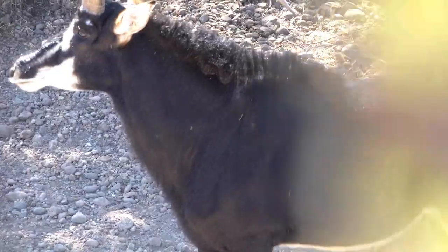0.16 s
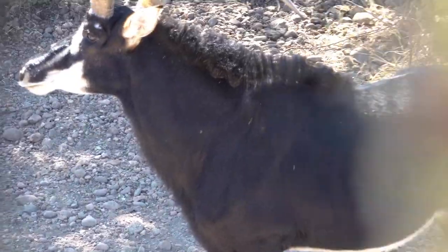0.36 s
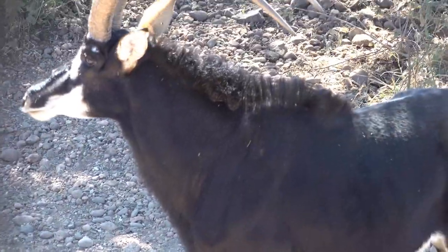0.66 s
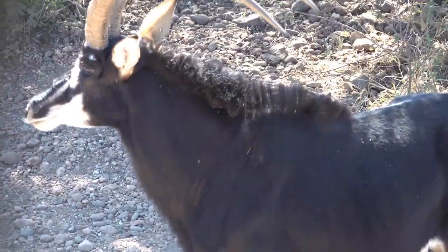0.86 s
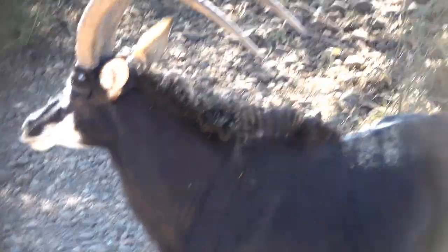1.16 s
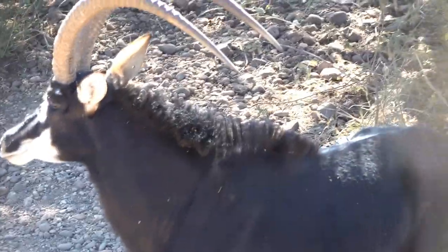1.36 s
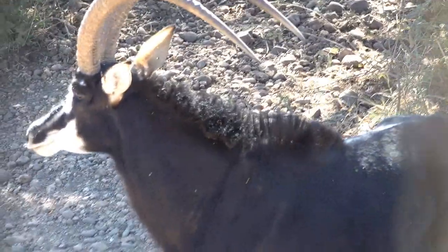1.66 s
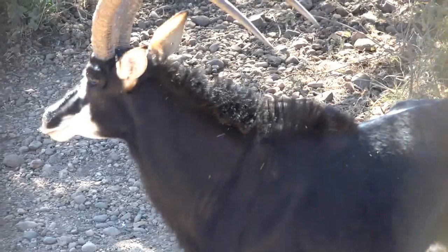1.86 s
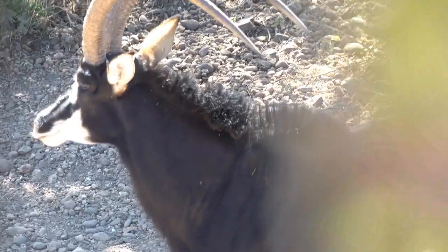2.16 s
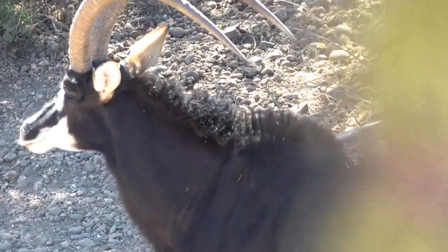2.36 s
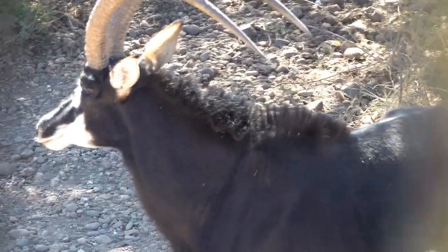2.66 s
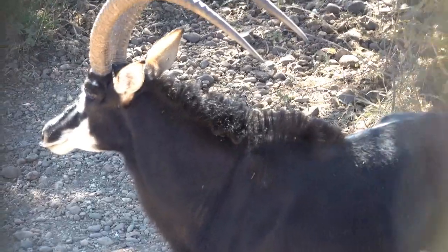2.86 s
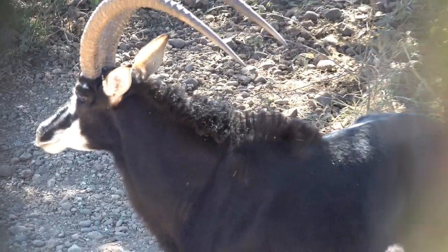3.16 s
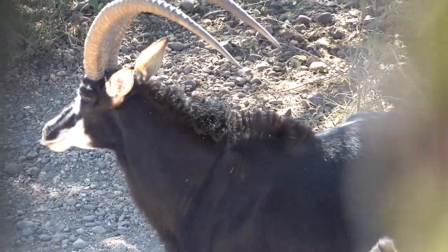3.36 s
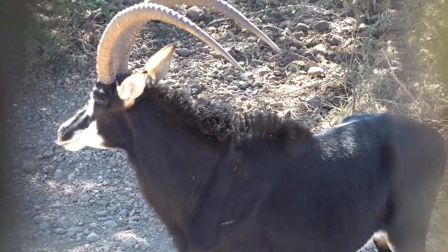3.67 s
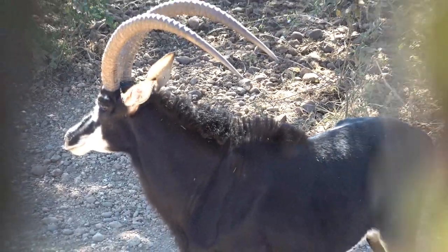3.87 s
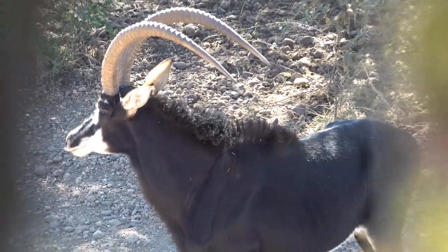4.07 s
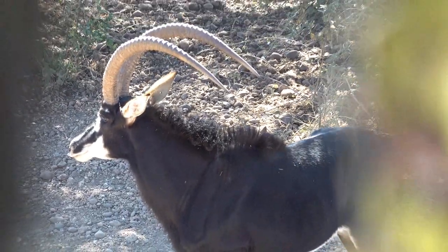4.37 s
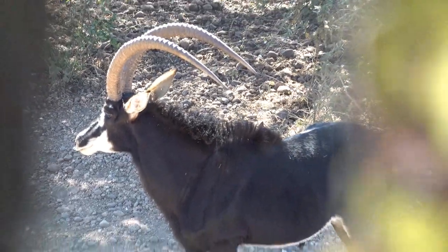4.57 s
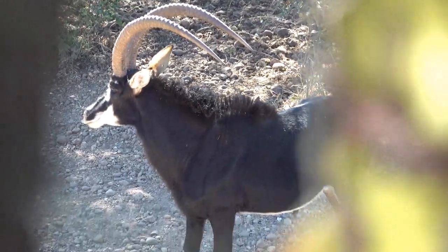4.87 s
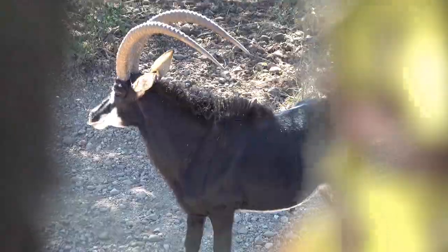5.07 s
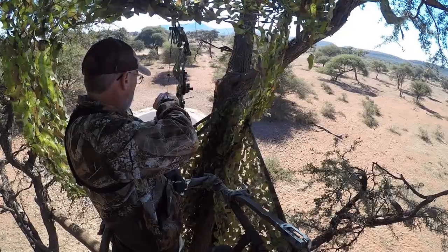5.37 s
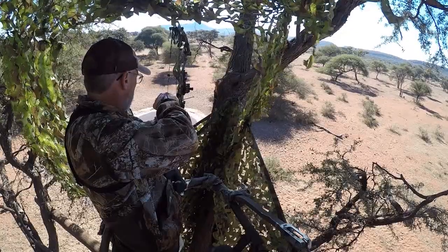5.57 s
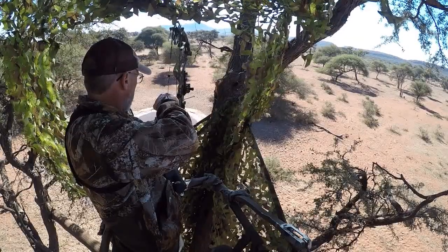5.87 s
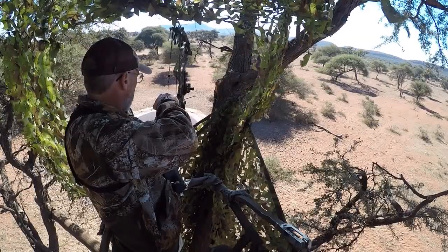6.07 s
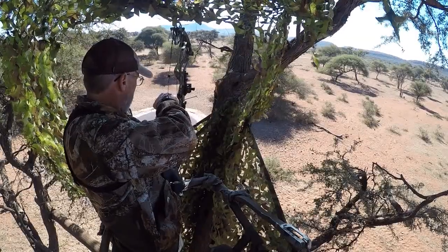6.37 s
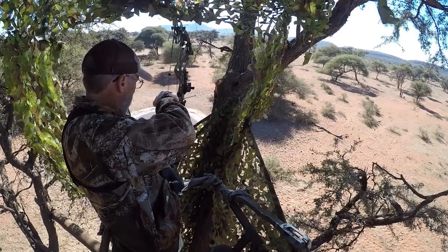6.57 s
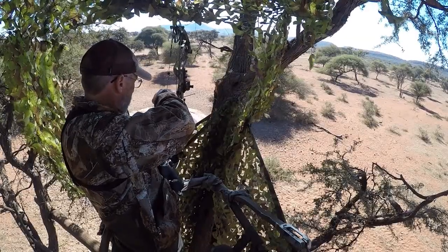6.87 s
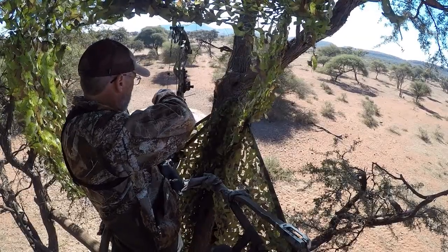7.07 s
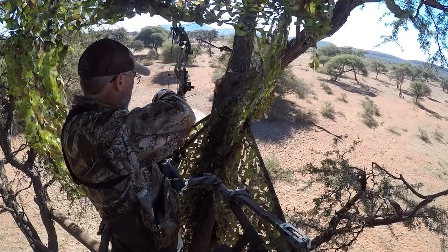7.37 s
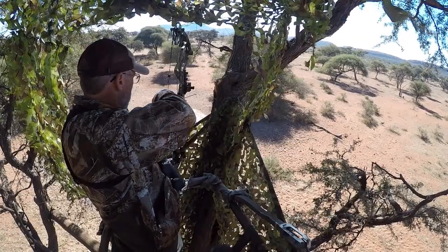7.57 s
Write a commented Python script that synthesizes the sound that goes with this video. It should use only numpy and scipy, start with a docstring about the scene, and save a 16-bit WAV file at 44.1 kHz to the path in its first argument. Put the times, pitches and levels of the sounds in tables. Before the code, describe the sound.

Dry open bush with many wild birds near and far, over quiet air, faint wide hiss and a barely audible high electronic whine. From 0 to 2 seconds it is sparser: soft rounded peeps, two faint low hoots near 0.5 and 1.1, a thin wavering whistle from 0.6 that dips and climbs, clearer peeps at 1.7, and dry twig ticks between 1.4 and 1.9. From 2.1 harsh falling chirps arrive with brief raspy chacks, and the distant chorus thickens around 3. Deep wind gusts buffet the microphone most at 2.5 to 3.5, again near 4.1 and 5.8, and lightly at 7.5. The wavering song returns around 3, 5 and 6.6. Two-part cheeps sound at 4.3, 4.8, 5.4 and 6.1. Rough chirps cluster near 6.7, then three clear peeps fade into sparse slurs, a chack and a thin squeak by 7.5. Scrub softly echoes everything.

```python
"""Many wild birds call together in dry bush: arched peeps, slurred whistles, a long wavering song,
harsh chirps, squeaks and chacks. They are sines on moving pitches; the chacks stack harmonics.
Two hoots come from far away, noise bursts make twigs tick, and the scrub echoes every call.
Shaped noise makes nearly mono gusts rumble, over still air and a faint hiss that differs left and right."""
import sys
import numpy as np
from scipy import signal
from scipy.fft import rfft, irfft, next_fast_len
from scipy.io import wavfile
from scipy.ndimage import map_coordinates

SR = 44100
rng = np.random.default_rng(int(sys.argv[2]) if len(sys.argv) > 2 else 0)


def persist_wave(psi):
    """Save psi, clipped to +-1, as 16-bit WAV."""
    counts = np.round(np.clip(psi, -1, 1) * 32767).astype(np.int16)
    wavfile.write(sys.argv[1], SR, np.atleast_2d(counts).T)


N = 340011


def amp(db):
    """Turn decibels into a gain."""
    return 10 ** (np.asarray(db) / 20)


def unit(x):
    """Scale a sound to an rms of 1."""
    return x / np.sqrt(np.mean(x ** 2) + 1e-20)


def along(points, hz):
    """Read (Hz, value) points at any frequency, on a log axis."""
    point_hz, values = np.transpose(points)
    return np.interp(np.log(hz + 1), np.log(point_hz + 1), values)


def curves(rows):
    """Give one value per sample for each column after the time."""
    seconds, *columns = np.transpose(rows)
    return [np.interp(np.arange(N) / SR, seconds, column) for column in columns]


def wobble(rate, size):
    """A smooth random curve through `rate` random points a second."""
    points = rng.standard_normal(int(size * rate / SR) + 4)
    return map_coordinates(points, [np.arange(size) * rate / SR])


def filtered(x, response):
    """Multiply the spectrum of x by a gain that depends on frequency."""
    size = next_fast_len(N + SR // 2)
    spectrum = rfft(x, size) * response(np.fft.rfftfreq(size, 1 / SR))
    return irfft(spectrum, size)[..., :N]


def noise(spectrum):
    """Coloured noise with an rms of 1."""
    return unit(filtered(rng.standard_normal(N), lambda hz: amp(along(spectrum, hz))))


def add(track, start_s, sound):
    """Mix a sound into a track, cutting what falls outside it."""
    start = round(start_s * SR)
    part = sound[max(-start, 0):max(N - start, 0)]
    track[max(start, 0):][:len(part)] += part


def progress(length_s):
    """Count from 0 to 1 through a note."""
    return np.linspace(0, 1, max(int(length_s * SR), 16))


def swell(u, power):
    """A note's loudness rises and falls; a small power makes it fuller."""
    return np.abs(np.sin(np.pi * u)) ** abs(power)


def glide(u, start, middle, end):
    """A parabola through three pitches."""
    return np.polyval(np.polyfit([0, .5, 1], [start, middle, end], 2), u)


def tone(hz):
    """A sine on a moving pitch, with an rms of about 1."""
    return np.sqrt(2) * np.sin(2 * np.pi * np.cumsum(hz) / SR)


def scrub(x, near_db, far_db):
    """Ground and branches give quick weak copies; the bush beyond gives a diffuse tail."""
    # time the tail takes to fade by 60 dB: pitch_hz [Hz], fade_s [s]
    decay_times = [(500, 0.96), (2300, 0.63), (4000, 0.36), (8000, 0.39)]
    hz, t, cells = signal.stft(rng.standard_normal(SR * 3 // 4), SR, nperseg=256)
    fade = amp(-60 * t / along(decay_times, hz)[:, None])
    tail = signal.istft(cells * fade, SR, nperseg=256)[1]
    answer = amp(far_db) * tail / np.linalg.norm(tail)
    delays_s = rng.uniform(0.001996, .028, size=12)
    signs = rng.choice([-1, 1], size=12)
    answer[(delays_s * SR).astype(int)] += amp(near_db) * signs / np.sqrt(len(delays_s))
    return x + signal.fftconvolve(x, answer)[:N]


def whistles(notes, power, waver, flicker_db, overtone_db, flat_top):
    """Nearly pure notes, each one bend of the syrinx (a bird's voice organ)."""
    out = np.zeros(N)
    for start_s, length_s, start_hz, middle_hz, end_hz, level_db in notes:
        u = progress(length_s)
        # flat_top above 0 gives quick flanks and a pitch that lingers at mid-note
        bend = u + flat_top * np.sin(2 * np.pi * u) / (2 * np.pi)
        hz = glide(bend, start_hz, middle_hz, end_hz) * (1 + waver * wobble(248.7, len(u)))
        voice = tone(hz) + amp(overtone_db) * tone(2 * hz)
        flicker = flicker_db * wobble(86.0, len(u))
        add(out, start_s, voice * swell(u, power) * amp(level_db + flicker))
    return out


def peeps():
    """Flat-topped arches of pitch, all one shape scaled to the top pitch."""
    # peeps: start_s [s], length_s [s], top_hz [Hz], level_db [dB before mixing]
    peep_calls = [(-0.044, 0.11, 2388, -40.5), (0.12, 0.097, 2530, -43), (0.265, 0.084, 2426, -40),
                  (1.148, 0.095, 2720, -44), (1.296, 0.1, 2554, -43), (1.447, 0.092, 2450, -45),
                  (1.724, 0.08, 2680, -32.5), (1.87, 0.081, 2452, -34), (3.454, 0.084, 2737, -28.5),
                  (4.168, 0.1, 2375, -41), (4.241, 0.097, 2690, -39.5), (4.326, 0.11, 2356, -40.5),
                  (4.397, 0.11, 2533, -39), (4.575, 0.11, 2510, -41), (6.755, 0.077, 2593, -31),
                  (6.905, 0.093, 2412, -29.5), (7.048, 0.082, 2302, -32), (7.13, 0.09, 2230, -46.5)]
    start_share, end_share = 0.72, 0.67  # pitch at the two feet, as shares of the top
    notes = [(start_s, length_s, start_share * top_hz, top_hz, end_share * top_hz, level_db)
             for start_s, length_s, top_hz, level_db in peep_calls]
    return whistles(notes, power=0.67, waver=0.0072, flicker_db=2.5, overtone_db=-48.5, flat_top=0.45)


def wind():
    """Gusts buffet the microphone in lumps; the strongest shed eddies that flutter above the rumble."""
    # gust strength: time_s [s], strength_db [dB before mixing]
    gusts = [(0.0, -50), (0.73, -53), (1.05, -44), (1.12, -51.5), (2.12, -51), (2.47, -30), (2.64, -40.5),
             (2.68, -29.5), (2.77, -42.5), (2.83, -35), (3.05, -53.5), (3.24, -34.5), (3.35, -39.5),
             (3.44, -29.5), (3.86, -43.5), (4.12, -33.5), (4.42, -45.5), (5.52, -44), (5.78, -34),
             (6.12, -50.5), (6.53, -43.5), (7.09, -53.5), (7.49, -39), (7.71, -45.5)]
    # colour of the rumble: pitch_hz [Hz], level_db [relative dB per Hz]
    rumble_spectrum = [(10, -11.5), (30, 1.5), (85, -0.5), (130, -5), (200, -12), (300, -19), (500, -37.5),
                       (1000, -52), (2500, -80)]
    # colour of the eddies: pitch_hz [Hz], level_db [relative dB per Hz]
    flutter_spectrum = [(60, -45), (120, 4.5), (200, -2.5), (320, -16), (500, -31), (1000, -39),
                        (2500, -75)]
    gust_db, = curves(gusts)
    gust_db = gust_db + 2.4 * wobble(22, N)
    rumble = amp(gust_db - 1.67) * noise(rumble_spectrum)
    # the flutter grows faster than the gust itself
    flutter = amp(-47 + 1.47 * (gust_db + 36.5)) * noise(flutter_spectrum)
    return rumble + flutter


def flock(count, low_hz, high_hz, length_s, slide, tail_db):
    """Distant birds slide up and down at random, blurred by the bush; rms 1."""
    notes = []
    for k, (when, pitch, life, slope, arch, loud) in enumerate(rng.random((count, 6))):
        start_s = (k + when) / count * N / SR
        hz = low_hz * (high_hz / low_hz) ** pitch
        fall = slide * (slope - .35)  # more often down than up
        middle_hz = hz * (1 + .25 * (arch - .3))
        notes.append((start_s, length_s * (.5 + life), hz * (1 + fall), middle_hz, hz * (1 - fall), 5 * loud))
    calls = whistles(notes, power=0.9, waver=0.016, flicker_db=4.5, overtone_db=-41.5, flat_top=0)
    return unit(scrub(calls, near_db=3.5, far_db=tail_db))


def background():
    """Still air and the far flock, with a faint hiss that differs left and right and an electronic whine."""
    # loudness of the distant flock: time_s [s], level_db [dB before mixing]
    chorus = [(0, -57.5), (2.2, -53), (3, -47), (4.5, -51), (5.5, -49.5), (6.8, -55.5), (7.7, -54.5)]
    # colour of the still air: pitch_hz [Hz], level_db [relative dB per Hz]
    air_spectrum = [(120, -27), (200, -1.5), (321, -0.5), (598, -7), (718, -9), (1600, -10.5), (2350, -11),
                    (2930, -16), (3850, -13), (5350, -21.5), (9770, -24.5), (14100, -25.5), (15700, -26.5)]
    # colour of the faint hiss: pitch_hz [Hz], level_db [relative dB per Hz]
    hiss_spectrum = [(60, 9.5), (250, -5), (650, 6), (2500, -24.5), (6000, 1), (15000, 1.5)]
    whine_hz = 13776
    chorus_db, = curves(chorus)
    low = flock(count=150, low_hz=1544, high_hz=2650, length_s=.08, slide=.6, tail_db=-8.5)
    middle = flock(count=50, low_hz=2105, high_hz=3410, length_s=.04, slide=.7, tail_db=-9)
    high = flock(count=330, low_hz=2958, high_hz=4547, length_s=.06, slide=.6, tail_db=26)
    far = amp(chorus_db - 6.5) * low + amp(chorus_db - 13.5) * middle + amp(chorus_db - 10) * high
    # the farthest chirps melt together into noise
    haze = amp(chorus_db - 17.5) * noise([(3500, -37), (4800, -6.0), (7200, -5.5), (8500, -15.5)])
    air = amp(-56.0) * noise(air_spectrum)
    hiss = amp(-61.5) * np.array([noise(hiss_spectrum) for _ in range(2)])  # left and right
    whine = amp(-93.0) * tone(np.full(N, whine_hz))
    return far + haze + air + hiss + whine


def slurs():
    """Slides between two pitches: quick ones bow upward, slow ones sag."""
    # whistles farther off: start_s [s], length_s [s], start_hz [Hz], end_hz [Hz],
    # level_db [dB before mixing]
    slur_calls = [(0.46, 0.079, 4980, 3980, -62), (0.706, 0.025, 4400, 3280, -49),
                  (1.325, 0.05, 2700, 4380, -59), (1.438, 0.013, 2615, 1286, -43.5),
                  (1.532, 0.061, 2840, 2380, -54.5), (1.937, 0.3, 2290, 2285, -54),
                  (2.195, 0.043, 4900, 3510, -53), (2.574, 0.12, 2540, 1906, -49),
                  (2.654, 0.052, 3410, 1980, -50.5), (2.869, 0.13, 2390, 1743, -44),
                  (2.957, 0.073, 2532, 2184, -42), (3.031, 0.1, 2104, 1760, -50),
                  (3.592, 0.075, 2080, 1814, -44), (3.657, 0.1, 3630, 3754, -50.5),
                  (3.675, 0.07, 5100, 3300, -53), (4.028, 0.072, 2810, 1850, -44.5),
                  (4.235, 0.021, 3710, 4200, -47), (4.396, 0.12, 3580, 4035, -37),
                  (5.135, 0.14, 2540, 1990, -53), (5.673, 0.11, 3484, 3936, -39),
                  (6.371, 0.29, 2207, 2215, -52), (6.718, 0.11, 2790, 2445, -38),
                  (7.257, 0.11, 3070, 2130, -58.5), (7.466, 0.072, 2470, 1900, -47.5),
                  (7.503, 0.03, 2780, 4580, -56), (7.531, 0.036, 3060, 2400, -50),
                  (7.565, 0.016, 4700, 2900, -57)]
    arch, sag_per_s = 0.09, 0.72  # shares of the pitch halfway between the two ends
    notes = []
    for start_s, length_s, start_hz, end_hz, level_db in slur_calls:
        middle_hz = (start_hz + end_hz) / 2 * (1 + arch - sag_per_s * length_s)
        notes.append((start_s, length_s, start_hz, middle_hz, end_hz, level_db))
    return whistles(notes, power=0.38, waver=0.0103, flicker_db=3.5, overtone_db=-38, flat_top=0.039)


def hoots():
    """Hoarse low calls: a few unevenly spaced tones that each shake on their own."""
    # far calls: start_s [s], length_s [s], pitch_hz [Hz before the glide], level_db [dB before mixing]
    hoot_calls = [(0.48, 0.093, 521.5, -48.5), (1.119, 0.08, 545, -46.5)]
    # tones of one hoot: multiple [times the pitch], level_db [relative dB]
    hoot_tones = [(1, -0.5), (1.139, -9), (1.662, -9.5), (2.8, -15)]
    out = np.zeros(N)
    for start_s, length_s, pitch_hz, level_db in hoot_calls:
        u = progress(length_s)
        hz = pitch_hz * glide(u, 1.03, 1.01, 0.93)
        voice = sum(amp(tone_db) * tone(multiple * hz * (1 + 0.015 * wobble(219, len(u))))
                    for multiple, tone_db in hoot_tones)
        add(out, start_s, voice * swell(u, 0.49) * amp(level_db))
    return out


def song():
    """A long thin whistle holds one pitch, dips from it several times and then climbs away."""
    # phrases: start_s [s], pitch_hz [Hz before dips and climb], level_db [dB before mixing]
    phrases = [(0.59, 3933, -49), (2.99, 3913, -50.5), (4.975, 3955, -49), (6.64, 3923, -49)]
    # pitch dips in every phrase: at_s [s into the phrase], half_width_s [s], depth_hz [Hz]
    pitch_dips = [(0.025, 0.017, 680), (0.085, 0.03, 109.7), (0.171, 0.03, 199), (0.237, 0.011, 470),
                  (0.38, 0.031, 520)]
    # syllables of every phrase: at_s [s into the phrase], length_s [s], level_db [relative dB]
    syllables = [(0.0, 0.025, -1), (0.058, 0.12, -1.5), (0.198, 0.055, 0.5), (0.261, 0.14, 0),
                 (0.39, 0.17, -1.5), (0.541, 0.21, -8)]
    phrase_s, climb_from_s, climb_hz_per_s2 = 0.74, 0.41, 6000
    out, t = np.zeros(N), progress(phrase_s) * phrase_s
    dips = sum(depth_hz * np.exp(-((t - at_s) / width_s) ** 2) for at_s, width_s, depth_hz in pitch_dips)
    climb = climb_hz_per_s2 * np.maximum(t - climb_from_s, 0) ** 2  # gathers speed
    effort = sum(amp(level_db) * swell(np.clip((t - at_s) / length_s, 0, 1), 0.52)
                 for at_s, length_s, level_db in syllables)
    for start_s, pitch_hz, level_db in phrases:
        hz = (pitch_hz - dips + climb) * (1 + 0.00403 * wobble(201.5, len(t)))
        add(out, start_s, tone(hz) * effort * amp(level_db + 2.1 * wobble(49.9, len(t))))
    return out


def chacks():
    """Rough harmonic stacks ring the bird's throat: they burst in bright and darken as they fade."""
    # chacks and nasal notes: start_s [s], length_s [s], pitch_hz [Hz before arch and jitter],
    # arch [share of the pitch], level_db [dB before mixing],
    # bright_db [dB per octave at mid-note], jitter [share of the pitch]
    chack_calls = [(1.02, 0.033, 342.6, 0.029, -39, 3.5, 0.044),
                   (1.31, 0.18, 619, 0.36, -54.5, -3.5, 0.028),
                   (2.127, 0.032, 340, 0.019, -39.5, 3.5, 0.084),
                   (3.6, 0.0356, 344, 0.055, -37, 5.5, 0.053),
                   (4.543, 0.024, 1777, 0.035, -37.5, -1.5, 0.085),
                   (6.213, 0.026, 1744, 0.059, -39.5, 2.5, 0.055),
                   (7.357, 0.029, 1222, 0.071, -41.5, 3.5, 0.17)]
    # resonances of the throat: pitch_hz [Hz], gain_db [dB]
    throat_gains = [(200, -18), (350, 11), (700, -19), (1050, 5.5), (1350, 1), (1750, 5), (2300, -0.5),
                    (2750, -6), (3400, -2), (4300, -3.5), (5000, 4), (5600, -13), (7000, -29.5),
                    (10000, -42)]
    out = np.zeros(N)
    for start_s, length_s, pitch_hz, arch, level_db, bright_db, jitter in chack_calls:
        u = progress(length_s)
        bend = 1 + arch * (swell(u, 0.92) - 2 / np.pi)  # stays near the pitch on average
        hz = pitch_hz * bend * (1 + jitter * wobble(1457, len(u)))
        tilt_db = bright_db + 8 * (.5 - u)
        harmonics = range(1, int(SR / 4 / pitch_hz))
        stack = sum(amp(tilt_db * np.log2(k * pitch_hz / 3000)) * tone(k * hz) for k in harmonics)
        ragged = amp(3.5 * wobble(400, len(u)))
        throat = amp(along(throat_gains, np.fft.rfftfreq(len(u), 1 / SR)))
        voice = irfft(rfft(stack * ragged) * throat, len(u))
        add(out, start_s, unit(voice) * swell(u ** 0.7, 0.5) * amp(level_db))
    return out


def squeaks():
    """High, thin, rising reedy notes in which only the third and fourth harmonics carry."""
    # squeaks: start_s [s], length_s [s], start_hz [Hz, of the third harmonic], level_db [dB before mixing]
    squeak_calls = [(1.097, 0.094, 6220, -60), (1.328, 0.12, 6100, -57), (3.246, 0.034, 6000, -53),
                    (3.71, 0.042, 6000, -53), (3.88, 0.053, 5780, -52), (5.609, 0.042, 6550, -57.5),
                    (6.596, 0.04, 6100, -51), (6.744, 0.042, 6440, -56), (7.475, 0.051, 6460, -45)]
    rise = 0.088  # share of the starting pitch
    out = np.zeros(N)
    for start_s, length_s, start_hz, level_db in squeak_calls:
        u = progress(length_s)
        third_hz = start_hz * (1 + rise * np.sin(np.pi / 2 * u)) * (1 + 0.006 * wobble(414, len(u)))
        voice = tone(third_hz) + amp(-10) * tone(third_hz * 4 / 3)
        add(out, start_s, voice * swell(u, 0.27) * amp(level_db))
    return out


def ticks():
    """Dry twigs snap with a crack of noise and a small woody knock."""
    # twigs: start_s [s], level_db [dB before mixing], knock_db [dB relative to the crack]
    twigs = [(1.4455, -41.5, -19), (1.6442, -42, -16), (1.712, -43, -5), (1.7903, -43, -7),
             (1.921, -41.5, -7), (2.624, -38, -12), (3.52, -41, -17), (4.1984, -49, 2), (4.2172, -47.5, 3),
             (5.43, -45, -14), (6.5427, -53.5, 14.5), (7.0937, -48.5, -13.5)]
    out, t = np.zeros(N), np.arange(SR // 20) / SR
    for start_s, level_db, knock_db in twigs:
        # each part fades by 60 dB in the given seconds
        crack = rng.standard_normal(len(t)) * amp(-60 * t / 0.033)
        knock = np.sin(2 * np.pi * 1500 * t) * amp(-60 * t / 0.005)
        add(out, start_s, amp(level_db + 1.0) * (crack + amp(knock_db) * knock))
    return filtered(out, lambda hz: amp(along([(400, 0.5), (1500, 7.5), (6500, -3.5), (12000, -20)], hz)))


def sweep(length_s, start_hz, end_hz, rasp):
    """An even slide in octaves, made harsh by a fast uneven shake; the roughest break up into a scratch."""
    u = progress(length_s)
    buzz = tone(330 * (1 + 0.248 * wobble(122.5, len(u))))
    shake = 0.42 * buzz + 0.575 * wobble(900, len(u))
    hz = start_hz * (end_hz / start_hz) ** u * (1 + rasp * shake)
    scratch = 13 * rasp ** 2 * wobble(2800, len(u))
    voice = tone(hz) * (1 + scratch) + amp(-25) * tone(2 * hz)
    flicker = amp(2.0 * wobble(270.0, len(u)))
    return unit(voice * flicker) * swell(u ** 0.75, 0.44)  # starts hard


def chirps():
    """A chirp is one rough sweep; a cheep opens with a clear step, flicks up to its top and falls roughly."""
    # chirps: start_s [s], length_s [s], start_hz [Hz], end_hz [Hz], level_db [dB before mixing]
    chirp_calls = [(1.843, 0.034, 4810, 3470, -43.5), (2.192, 0.063, 4220, 2130, -38),
                   (2.352, 0.05, 6770, 4960, -40.5), (2.392, 0.044, 5020, 2120, -38),
                   (2.776, 0.021, 5800, 3690, -44), (2.797, 0.055, 3940, 2880, -34.5),
                   (3.194, 0.035, 8050, 7370, -50.5), (3.216, 0.038, 4130, 2520, -36.5),
                   (3.405, 0.04, 7000, 2910, -44), (3.949, 0.054, 3765, 2810, -35),
                   (4.087, 0.037, 8300, 4610, -41.5), (4.55, 0.073, 5495, 2323, -34),
                   (5.013, 0.13, 3400, 1745, -39), (5.213, 0.03, 4640, 7560, -46),
                   (5.246, 0.057, 7170, 2780, -40), (5.698, 0.037, 3740, 3020, -40.5),
                   (5.78, 0.04, 7200, 5300, -53), (5.832, 0.024, 7220, 4410, -39.5),
                   (5.845, 0.078, 4650, 1954, -35.5), (6.397, 0.11, 3206, 1900, -40.5),
                   (6.48, 0.042, 3810, 2294, -36.5), (6.626, 0.052, 5940, 2780, -37),
                   (6.658, 0.037, 7250, 3100, -40.5), (6.732, 0.03, 4250, 3120, -34),
                   (6.738, 0.057, 2550, 1840, -33.5)]
    # cheeps of a step, a flick and a fall: start_s [s], climb_s [s], fall_s [s], top_hz [Hz],
    # level_db [dB before mixing]
    cheep_calls = [(4.285, 0.041, 0.036, 6280, -40), (4.801, 0.042, 0.041, 7070, -37),
                   (5.439, 0.03, 0.053, 6380, -35.5), (6.09, 0.041, 0.077, 7170, -35)]
    step_from_hz, step_to_hz, fall_to_hz = 4380, 4810, 2670
    out = np.zeros(N)
    for start_s, length_s, start_hz, end_hz, level_db in chirp_calls:
        # the steeper the sweep in octaves a second, the rougher
        rasp = 0.052 + 0.004 * abs(np.log2(end_hz / start_hz)) / length_s
        add(out, start_s, amp(level_db) * sweep(length_s, start_hz, end_hz, rasp))
    for start_s, climb_s, fall_s, top_hz, level_db in cheep_calls:
        step = sweep(0.72 * climb_s, step_from_hz, step_to_hz, rasp=0.039)
        flick = sweep(0.78 * climb_s, 0.84 * top_hz, 1.03 * top_hz, rasp=0.094)
        fall = sweep(fall_s, 0.73 * top_hz, fall_to_hz, rasp=0.093)
        add(out, start_s, amp(level_db) * step)
        add(out, start_s + 0.56 * climb_s, amp(level_db - 9.5) * flick)
        add(out, start_s + climb_s, amp(level_db - 0.1) * fall)
    # the ground's copy arrives about 2 ms late and beads each sweep
    ground_copy = np.interp(np.arange(N) - 0.00189 * SR, np.arange(N), out)
    out = out + amp(-11.0) * ground_copy
    return filtered(out, lambda hz: amp(along([(7400, -3.0), (8600, -7.5), (11000, 0)], hz)))


def scene():
    """Each kind of call sits at its own depth in the scrub, over wind and background."""
    birds = amp(-3.0) * scrub(peeps(), near_db=-7.5, far_db=-20)
    birds += amp(0.5) * scrub(slurs(), near_db=-10.0, far_db=-9.0)
    birds += amp(0.5) * scrub(hoots(), near_db=-9, far_db=-4)
    birds += amp(5.0) * scrub(song(), near_db=-9.5, far_db=-13)
    birds += amp(2.5) * scrub(chacks(), near_db=-10, far_db=-13.0)
    birds += amp(-4.5) * scrub(squeaks(), near_db=-7, far_db=-27.0)
    birds += amp(-2.5) * scrub(chirps(), near_db=-6.5, far_db=-6.5)
    twigs = scrub(ticks(), near_db=-12.0, far_db=-3)
    return birds + twigs + wind() + background()


def record(dry):
    """The camera keeps nothing above its band limit."""
    top_hz = 15850
    return filtered(dry, lambda hz: hz < top_hz)


dry = scene()
out = record(dry)
persist_wave(out)
```